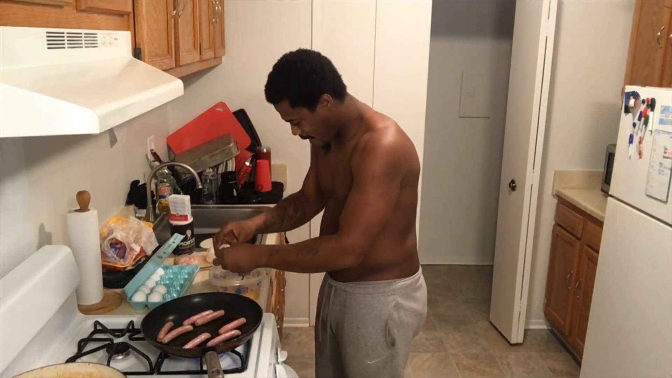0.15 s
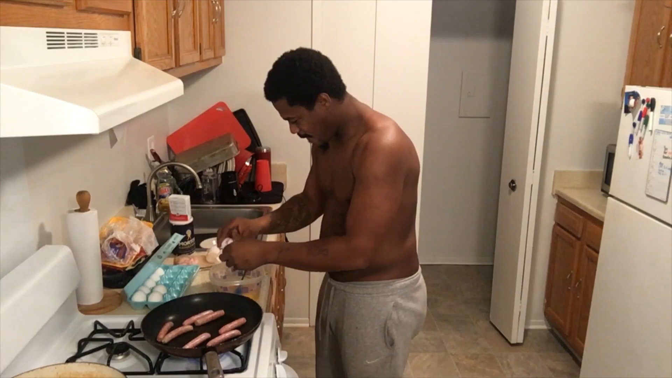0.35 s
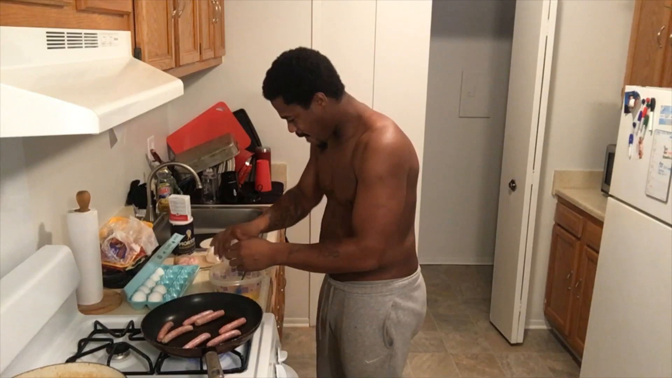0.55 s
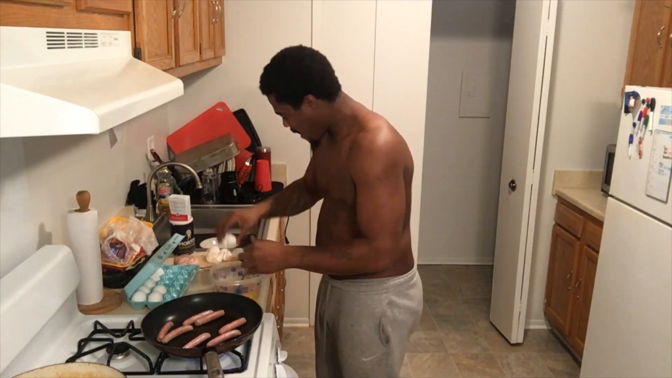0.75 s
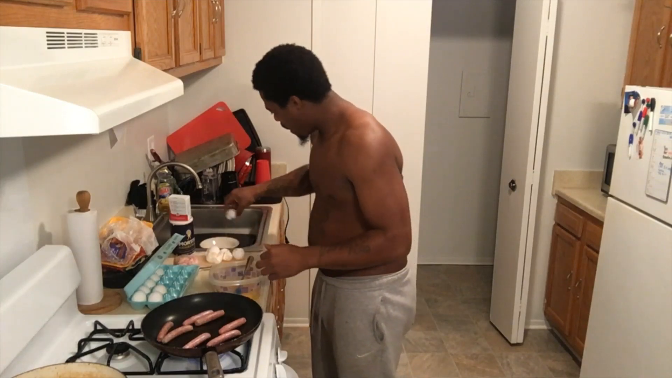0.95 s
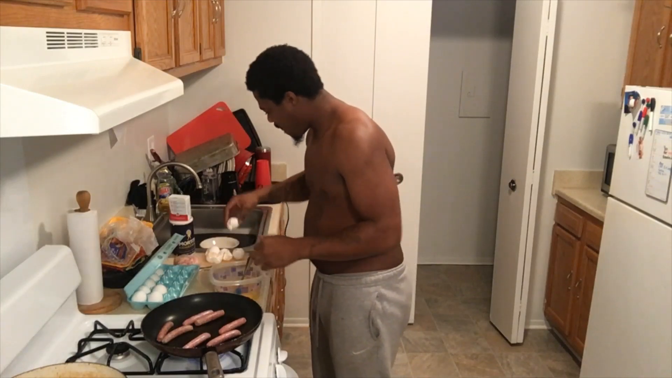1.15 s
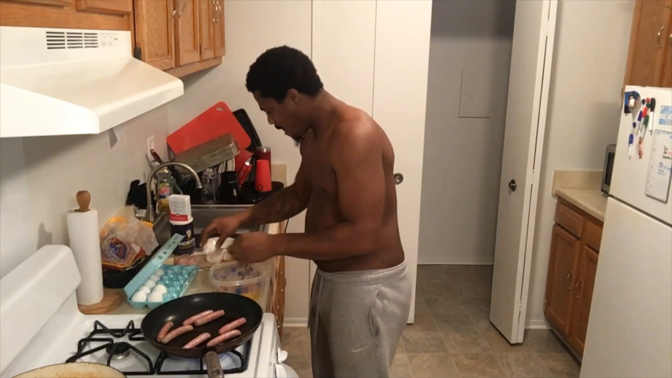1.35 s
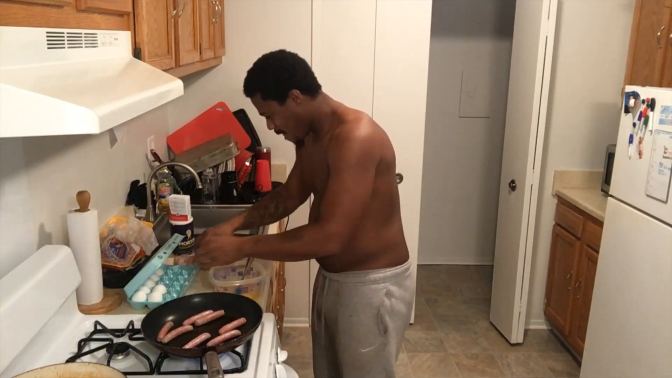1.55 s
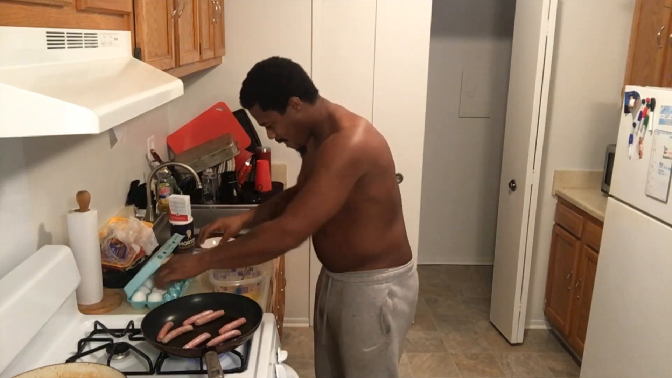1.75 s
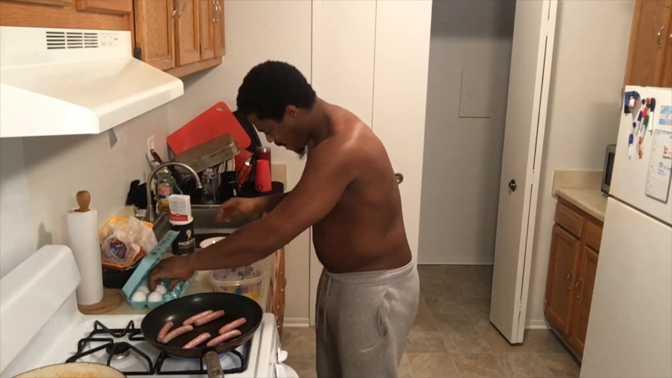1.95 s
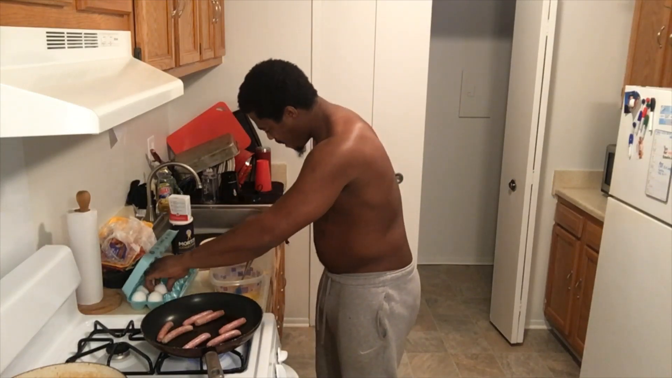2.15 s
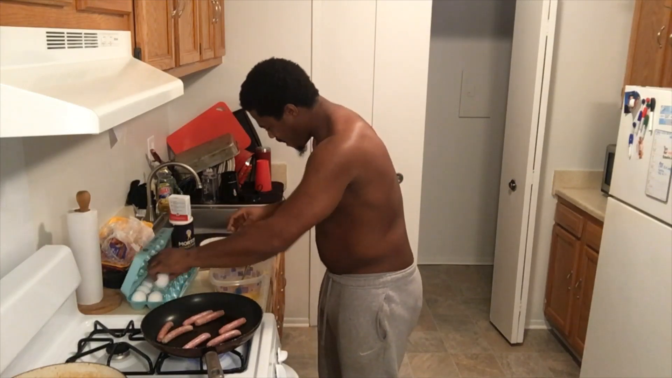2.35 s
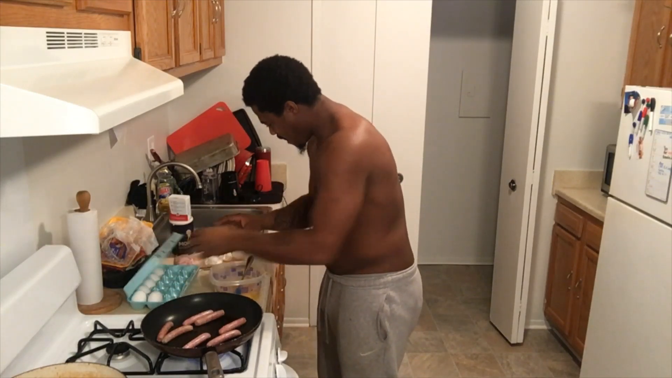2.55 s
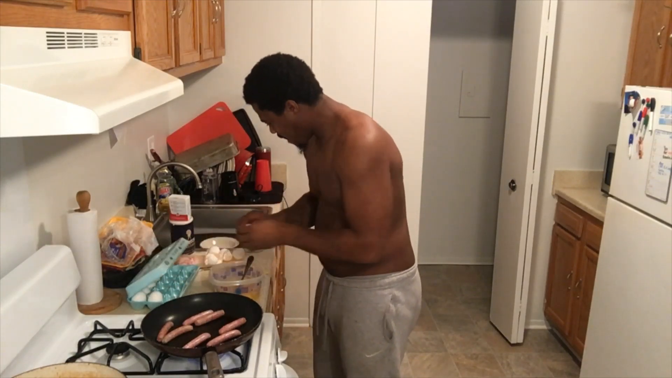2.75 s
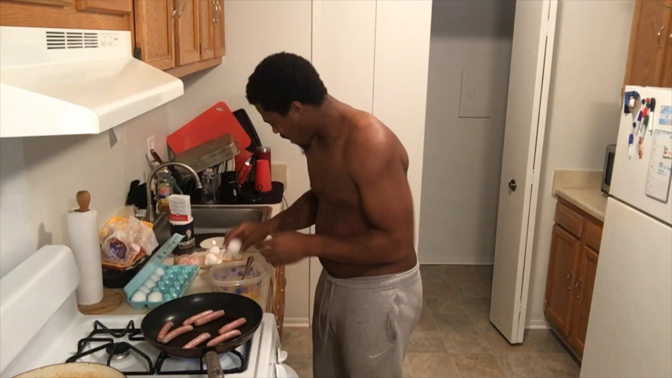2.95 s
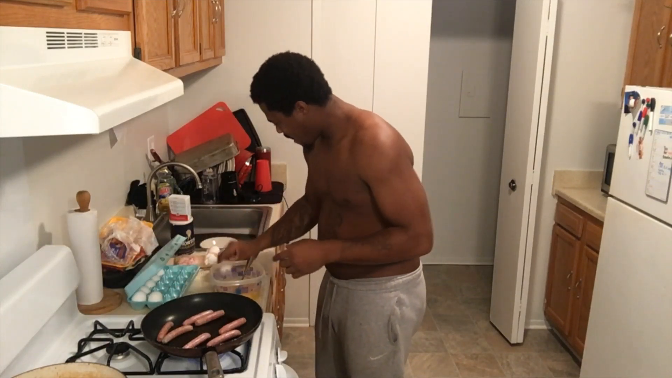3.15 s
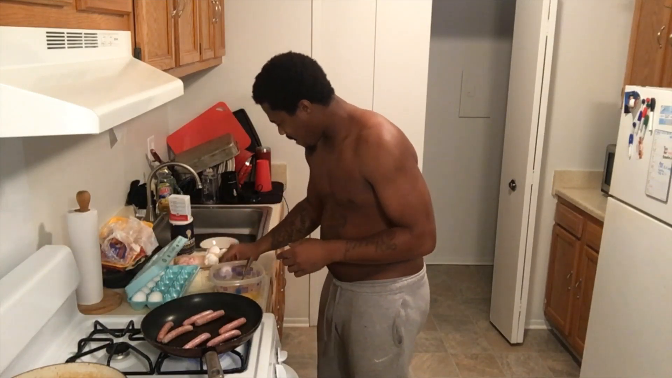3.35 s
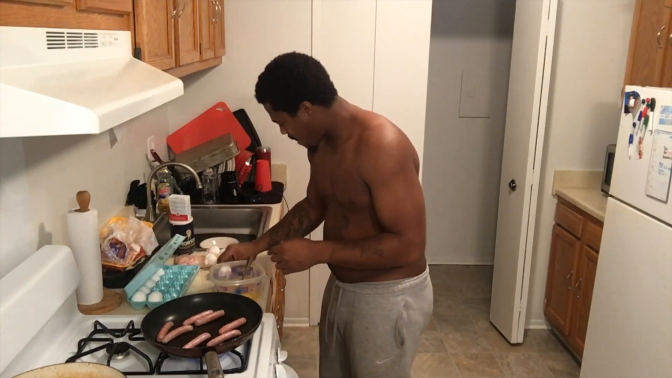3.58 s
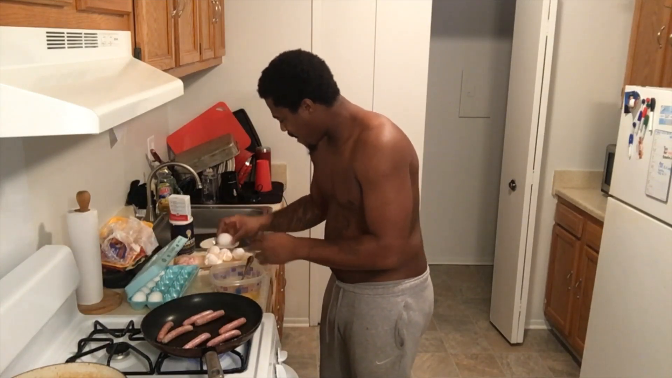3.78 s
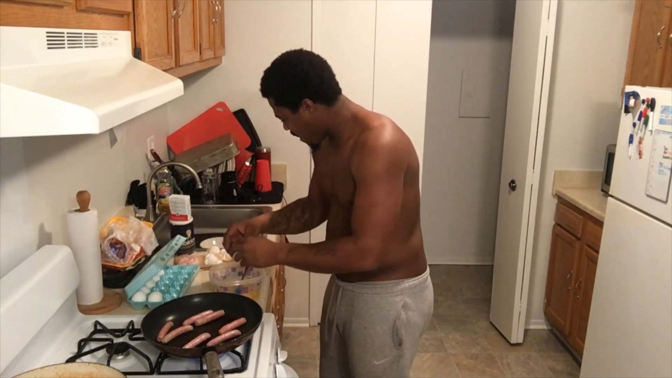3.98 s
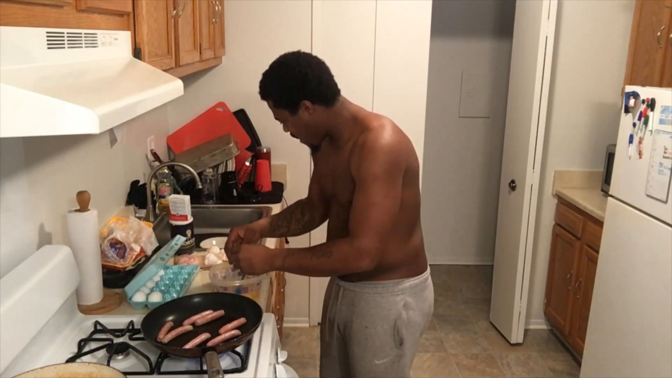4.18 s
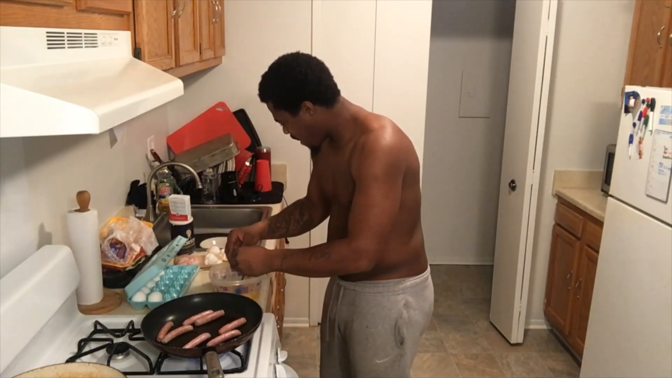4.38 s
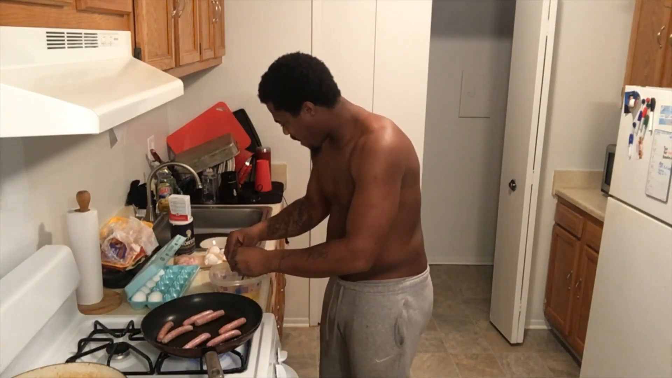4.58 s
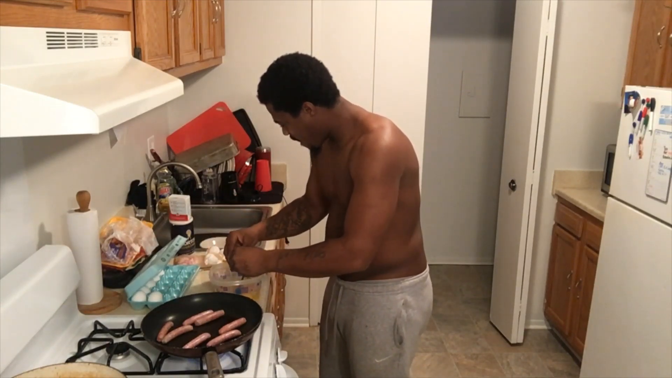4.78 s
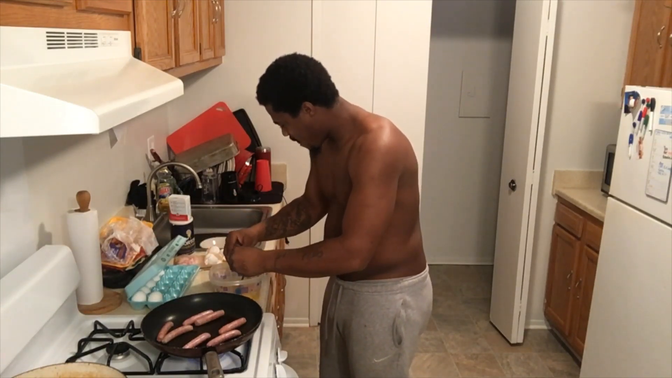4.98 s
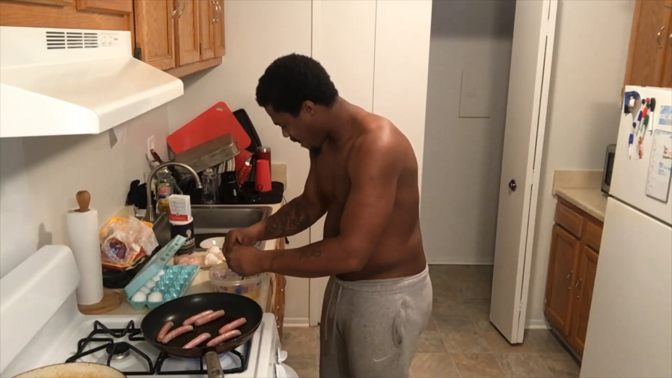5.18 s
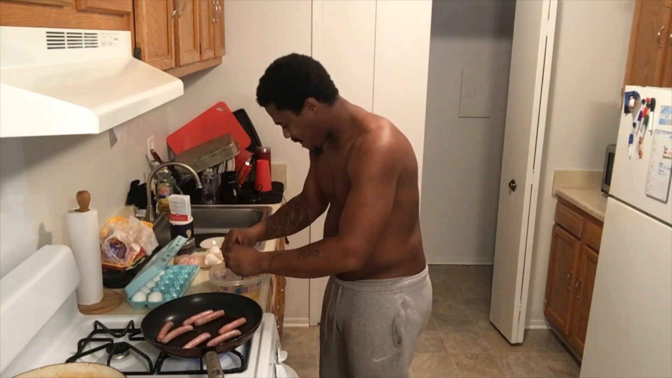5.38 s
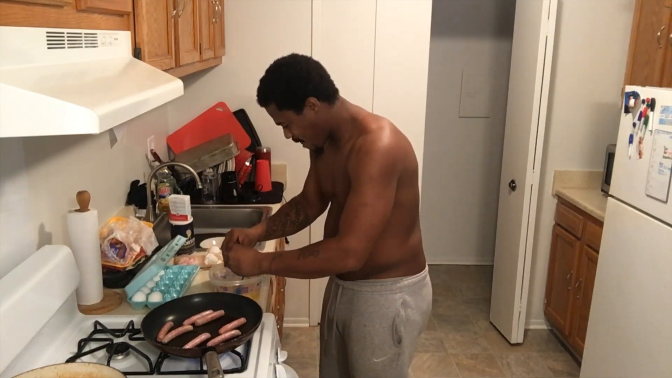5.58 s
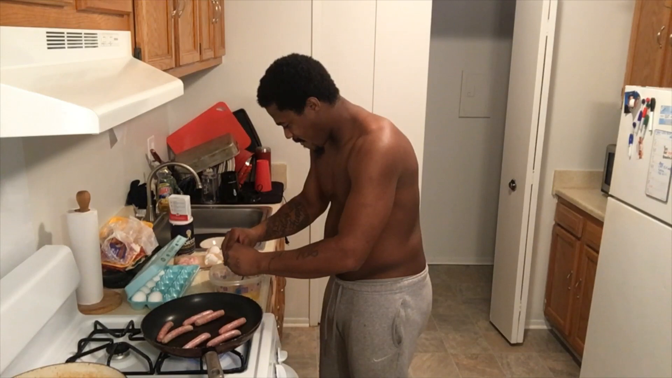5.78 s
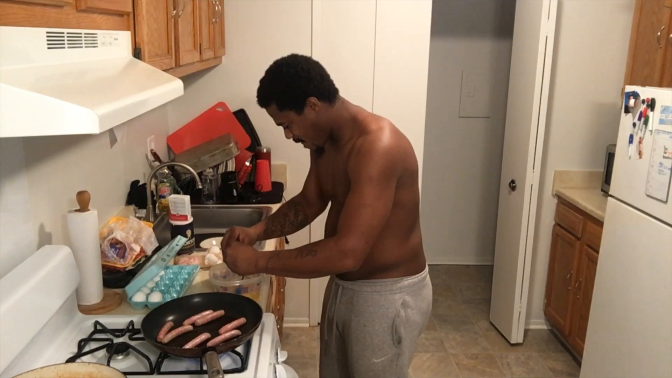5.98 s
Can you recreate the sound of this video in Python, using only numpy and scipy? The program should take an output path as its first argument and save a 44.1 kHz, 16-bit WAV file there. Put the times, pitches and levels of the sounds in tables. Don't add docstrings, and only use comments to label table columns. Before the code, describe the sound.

A small hard-walled kitchen, heard from a few steps away through a thin, midrange-heavy phone microphone. A very faint pan sizzle, appliance hum and low house rumble run throughout. From 0 to 0.5 seconds, thin eggshells knock together in quick, hollow, irregular ticks, clearest around 0.3. Sparse faint clicks follow, then a brighter shell clatter at 1.5. Between about 1.65 and 2.45, fingers rustle and squeak in a foam carton, with soft boxy bumps. After a quiet gap, an egg hits a bowl rim at 3.3, by far the loudest, sharp and ringing; duller raps with counter thuds follow at 3.5 and 3.7, the last crunching. Small splinters snap until 3.9. From 4.3 to 5.8, sparse delicate crackles and slightly wet tears mark the shell being pried open, strongest near 5.0. At 5.9 a shell piece drops with a quick little bounce.

```python
import sys
import numpy as np
from scipy import signal
from scipy.io import wavfile
from scipy.ndimage import uniform_filter1d

SR = 44100
rng = np.random.default_rng(int(sys.argv[2]) if len(sys.argv) > 2 else 0)


def unload_wav(signal):
    wavfile.write(
        sys.argv[1],
        SR,
        np.round(np.clip(np.atleast_2d(signal).T, -1, 1) * 32767).astype(np.int16),
    )


def volts_from_decibels(level):
    exponent = np.asarray(level, float) / 20
    return 10 ** exponent


N = 265923

# start in seconds, peak in dB, shell pitch in Hz, counter thud in dB, crack in dB.
RIM_BLOWS = [
    (3.2867, -13.5, 1100, -21, -1),
    (3.4702, -24.5, 1904, -8.5, 1),
    (3.671, -27, 2982, -9.5, 6),
]
# frequency in Hz, level in dB, decay time t60 in seconds.
BOWL_MODES = [(603.6, -6, .3), (728, -4.5, 0.35), (853, 0, 0.26), (960, 2.5, 0.24), (1077, 5.5, 0.22),
              (1100, 7, .14), (1270, -6, 0.16), (1756, -3, .25), (1855, -0.5, .2), (1940, -8.5, 0.16),
              (2150, -1.5, 0.18), (2330, 2, .12)]
# frequency in Hz, level in dB, decay time t60 in seconds.
COUNTER_MODES = [(45.7, -16.5, .15), (73.2, -11, 0.29), (117.5, -2.5, 0.3), (148.7, -1, 0.2),
                 (212, -3, 0.33), (258, -13.5, 0.16), (354, -18, 0.11), (485, -9, 0.072),
                 (545, -16.5, 0.36)]
BOWL_DB, BOWL_LOSS_DB_PER_CRACK = -12.5, 1.5

# start in seconds, peak in dB, cavity pitch in Hz, crack in dB.
SHELL_KNOCKS = [(0.0096, -52.5, 1940, -17), (0.0392, -48.5, 2000, -4), (0.0963, -46.5, 1310, -17),
                (0.1929, -52, 1240, -14), (0.2762, -36.5, 1267, -3), (0.2904, -36.5, 1500, -8),
                (0.3105, -45, 1870, 0), (0.3228, -36.5, 1340, -3), (0.3372, -40, 1244, -13),
                (0.3618, -42, 1330, -13), (0.412, -47, 1240, -10), (0.4522, -39, 1326, 0),
                (0.4561, -51, 2070, -7), (0.9336, -50, 1420, -13), (1.1262, -44.5, 1384, -16),
                (1.5074, -46.5, 1510, 0), (1.5241, -31, 1330, -2), (1.5328, -33.5, 1510, 2),
                (1.5434, -34, 2180, 1), (1.5744, -45, 2220, -8), (1.6193, -49, 1170, 10)]
# start in seconds, peak in dB, pitch in Hz, crack in dB.
PIECE_DROPS = [
    (5.8884, -29.5, 1900, -3),
    (5.9085, -38, 2500, -8),
    (5.9194, -36, 1900, -6),
    (5.9349, -41, 2000, -9),
]
# start in seconds, peak in dB, pitch in Hz, crack in dB.
SPLINTER_SNAPS = [(0.6393, -42.5, 2770, 0), (1.386, -48.5, 3000, 4), (1.4439, -43, 3060, 4),
                  (2.0777, -45, 2380, 9), (3.05, -51, 2870, 7.5), (3.678, -23.5, 2930, -14),
                  (3.6934, -50, 2880, -14), (3.767, -39, 2400, 5), (3.7878, -39.5, 3150, 3),
                  (3.9188, -37, 2820, 2.5)]
# start in seconds, peak in dB, pitch in Hz, crack in dB.
THUMB_PRISES = [(4.2867, -57, 2820, 4), (4.4876, -36.5, 2790, 2), (4.5087, -51, 2500, 2),
                (4.5756, -42, 3000, 3), (4.6288, -55, 3100, 4), (4.6873, -44, 2750, -9),
                (4.6937, -48, 3080, 1), (4.7776, -54, 2540, 10), (4.806, -57.5, 2620, 11),
                (4.8718, -57, 2680, 0), (4.9946, -44, 3470, -8), (5.0034, -50, 3200, -3),
                (5.0093, -39.5, 2190, 0), (5.017, -31, 2430, 1), (5.026, -53, 2660, -6),
                (5.0834, -51, 2420, 5), (5.3472, -44.5, 2680, -3), (5.691, -48.5, 2620, 0),
                (5.7324, -51.5, 3100, 11), (5.7544, -39, 3120, 5.5), (5.766, -45, 3050, -2),
                (5.8777, -47, 2400, 13)]
# start in seconds, peak in dB, pitch in Hz, crack in dB.
WET_TEARS = [(1.861, -47.5, 525, -16), (2.27, -54, 534, -9), (4.486, -66, 540, -14), (5.014, -42, 680, -8),
             (5.02, -46, 1250, -6), (5.754, -55.5, 786, -14)]

# t60 at 1 kHz in seconds, damping exponent of pitch, bright edge in
# dB, frequency ratio of the second mode, second mode in dB, trim in dB.
SHELL_RINGING = (0.02, 0.47, -19, 1.52, -5, -3.5)
DROP_RINGING = (.02, 0.5, -24, .76, -8, -2)
SNAP_RINGING = (0.0225, 0.56, -8.5, .71, -4.5, -2.5)
PRISE_RINGING = (0.0267, 0.9, -5.5, 0.8, -6, -2.5)
TEAR_RINGING = (0.1, 0.2, -29, 6.5, -20, -10)
EDGE_FOLLOW = 0.49

# time in seconds, rustle level in dB.
HAND_PRESSURE = [(1.64, -71), (1.658, -59), (1.69, -70), (1.77, -71), (1.85, -58.5), (2.2, -55.5),
                 (2.268, -52.5), (2.39, -57.5), (2.44, -68)]
# time in seconds, box boom in dB, boom pitch in Hz, scrape in dB.
CARTON_GRIPS = [(1.725, -56, 210, -78), (1.876, -54, 181, -49.5), (1.962, -56.5, 515, -50.5),
                (2.268, -52.5, 473, -55.5), (2.328, -53.5, 477, -61), (2.424, -70, 330, -49.5)]
# start in seconds, peak in dB, pitch in Hz, length in seconds.
FOAM_SQUEAKS = [(1.8593, -40, 2760, 0.016), (1.88, -42, 2740, 0.014), (1.9044, -55, 2350, 0.023),
                (2.2236, -40, 2780, 0.015), (2.262, -47, 2530, 0.066), (2.283, -45, 2860, 0.018),
                (2.352, -38.5, 3030, 0.02), (2.368, -49, 2760, 0.024), (2.3989, -41, 2960, 0.026),
                (2.4144, -67, 2690, 0.03)]
GRIP_RISE_DB_PER_S, GRIP_FALL_DB_PER_S, LET_GO_S = 600, 230, 0.046

# start in seconds, peak in dB, pitch in Hz, t60 in seconds.
CABINET_THUMPS = [(1.461, -49, 49.4, 0.15), (1.71, -46.5, 190, 0.17), (1.74, -43.5, 75, 0.15),
                  (1.791, -52, 61.9, 0.24), (1.869, -48, 115, 0.15), (2.369, -56, 45.8, 0.15),
                  (3.662, -37, 109, 0.13), (3.818, -45, 73, 0.19), (5.949, -70, 72.7, 0.13)]

# frequency in Hz, level in dB.
SIZZLE_SPECTRUM = [(800, -33.5), (1600, -12.5), (2800, 3), (4000, -11), (5200, -2), (8000, -1.5),
                   (11000, -5.5), (15000, -0.5)]
# frequency in Hz, level in dB.
RUMBLE_SPECTRUM = [(20, -17.5), (50, 1.5), (120, -14.5), (180, -16), (250, -8.5), (500, -15.5), (1000, -22),
                   (1600, -18.5), (3000, -17)]
# frequency in Hz, rms level in dB.
MOTOR_LINES = [(80.7, -86.5), (118.4, -73.5), (242.2, -71.5), (419.9, -79.5)]
SIZZLE_DB, RUMBLE_DB = -62, -60

# frequency in Hz, t60 in seconds.
KITCHEN_T60 = [(100, 0.6), (700, 0.5), (1840, 0.56), (4000, 0.44), (6000, 0.34), (12000, 0.14)]
# delay in seconds, level in dB.
NEAR_ECHOES = [(.0031, 1), (.0043, 3), (.0068, -8), (.0102, -1.5), (.0160, -14.5), (.0230, -2.5),
               (.0320, -9.5), (.0450, -14)]

# frequency in Hz, gain in dB.
MIC_RESPONSE = [(18, -10), (45, -2), (1500, -1), (2800, 5.5), (3300, 1.5), (4000, -10), (5100, -20),
                (5450, -24), (7800, -16), (9500, -21), (10500, -28.5), (14800, -35.5), (15600, -62.5),
                (22000, -57.5)]
# centre in seconds, length in seconds.
DROPOUTS = [(.234, .005), (.663, .004), (.789, .007), (.853, .007), (.918, .005), (1.042, .020),
            (1.559, .005), (1.685, .006), (1.794, .012), (1.898, .007), (2.755, .008), (3.776, .007),
            (4.223, .010), (4.532, .019), (4.716, .005), (5.355, .006)]
# frequency in Hz, share dropped from 0 to 1.
WEAK_BANDS = [(500, 0), (800, .6), (1600, 0), (2200, 0), (3600, 0), (4200, 0.8), (16000, 0.84)]
DROPOUT_DB, DROPOUT_DB_PER_S = -15, -600


def evened(x):
    return x / np.sqrt(np.mean(x ** 2) + 1e-20)


def read(points, hz):
    f, value = np.transpose(points)
    return np.interp(np.log(hz + 1), np.log(f + 1), value)


def add(mix, s, sound):
    part = mix[round(s * SR):][:len(sound)]
    part += sound[:len(part)]


def coloured(x, spectrum):
    hz = abs(np.fft.fftfreq(8192, 1 / SR))
    log_gain = np.log(volts_from_decibels(read(spectrum, hz)))
    phase = signal.hilbert(log_gain).imag
    taps = np.fft.ifft(np.exp(log_gain - 1j * phase)).real
    if abs(taps[:4096]).sum() < abs(taps[4096:]).sum():
        taps = np.roll(taps[::-1], 1)
    return signal.oaconvolve(x, taps[:4096])[:len(x)]


def resonate(x, hz, width):
    turn = np.exp(2j * np.pi * np.cumsum(hz * np.ones(len(x))) / SR)
    r = np.exp(-np.pi * width / SR)
    return 2 * (turn * signal.lfilter([1 - r], [1, -r], x / turn)).real


def drift(rate_hz):
    knots = rng.standard_normal(400)
    return np.interp(np.arange(N) / SR * rate_hz, np.arange(len(knots)), knots)


def ring(hz, t60, rise=0.00052):
    t = np.arange(SR // 2) / SR
    return np.sin(2 * np.pi * hz * t) * volts_from_decibels(-60 * t / t60) * (1 - np.exp(-t / rise))


def crack(t60, hz, width, edge_db):
    fade = volts_from_decibels(-60 * np.arange(SR // 2) / SR / t60)
    jag = rng.choice([-1., 1.], len(fade)) * fade
    body = resonate(resonate(jag, hz, width), hz, 1.62 * width)
    body = body * np.linalg.norm(fade) / np.linalg.norm(body) * 0.5
    edge = resonate(resonate(jag, 3900, 3200), 6400, 6000)
    return body, volts_from_decibels(edge_db + 7) * edge


def blows():
    air, solid = np.zeros((2, N))
    bowl = sum(volts_from_decibels(db) * ring(hz, t60) for hz, db, t60 in BOWL_MODES)
    thud = sum(volts_from_decibels(db) * ring(hz, t60, rise=0.0078) for hz, db, t60 in COUNTER_MODES)
    for s, db, hz, thud_db, crack_db in RIM_BLOWS:
        bowl_db = BOWL_DB - BOWL_LOSS_DB_PER_CRACK * crack_db
        knock = volts_from_decibels(bowl_db + 10) * crack(0.023, 1070, 1100, -40)[0]
        shell = ring(hz, 0.0081) + volts_from_decibels(crack_db) * sum(crack(0.0051, 1950, 1970, -11))
        add(air, s, volts_from_decibels(db - 5.5) * (shell + knock))
        hollow = volts_from_decibels(-19) * ring(hz, 0.17, rise=0.004)
        hollow += volts_from_decibels(-16.5) * ring(hz * 0.972, 0.22, rise=0.004)
        rattle = volts_from_decibels(thud_db - 4) * crack(0.46, 356, 420, -60)[0]
        add(solid, s, volts_from_decibels(db) * (volts_from_decibels(bowl_db - 8) * bowl + hollow + rattle))
        add(solid, s, volts_from_decibels(db + thud_db + 1.5) * thud)
    return air, solid


def knocks(table, ringing):
    t60_1k, damping, edge_db, second_ratio, second_db, trim_db = ringing
    out = np.zeros(N)
    for s, db, hz, crack_db in table:
        t60 = t60_1k * (1000 / hz) ** damping
        body = ring(hz, t60) + volts_from_decibels(second_db) * ring(hz * second_ratio, 0.8 * t60)
        split, edge = crack(0.0063, 2860, 2000, edge_db + EDGE_FOLLOW * crack_db)
        add(out, s, volts_from_decibels(db + trim_db) * (body + volts_from_decibels(crack_db) * split + edge))
    return out


def carton():
    t = np.arange(N) / SR
    s, pressure_db = np.transpose(HAND_PRESSURE)
    touch = np.interp(t, [s[0], s[0] + 0.016, s[-1], s[-1] + LET_GO_S], [0, 1, 1, 0])
    at, boom_db, boom_hz, scrape_db = np.transpose(CARTON_GRIPS)[:, :, None]
    shape_db = np.minimum(GRIP_RISE_DB_PER_S * (t - at), GRIP_FALL_DB_PER_S * (at - t))
    strongest = np.argmax(boom_db + shape_db, axis=0)
    hz = uniform_filter1d(boom_hz[strongest, 0], size=600)

    slip_db = 3 * np.minimum(rng.exponential(1, N), 3)
    slips = rng.standard_normal(N) * volts_from_decibels(slip_db) * (rng.random(N) < 1500 / SR)
    rustle = resonate(slips, 2900, 600) + volts_from_decibels(8) * resonate(slips, 1980, 690)
    scrape = resonate(resonate(slips, 890, 900), 1200, 1600)
    boom = resonate(resonate(rng.standard_normal(N), hz, 390), hz, 450)

    out = volts_from_decibels(np.interp(t, s, pressure_db) - 11.5) * evened(rustle)
    out += volts_from_decibels((scrape_db + shape_db).max(0) - 15.5) * evened(scrape)
    out += volts_from_decibels((boom_db + shape_db).max(0) - 9) * evened(boom)
    out *= touch
    for start, db, squeak_hz, length in FOAM_SQUEAKS:
        rub = rng.standard_normal(4000)[:round(length * SR)]
        squeak = evened(resonate(rub, squeak_hz, 550)) * np.hanning(len(rub))
        add(out, start - 0.004, volts_from_decibels(db - 18) * squeak)
    return out


def thumps():
    out = np.zeros(N)
    for s, db, hz, t60 in CABINET_THUMPS:
        add(out, s, volts_from_decibels(db) * ring(hz, t60, rise=0.014))
    return out


def pan():
    burst_db = 2.3 * np.minimum(rng.exponential(1, N), 5)
    bursts = rng.standard_normal(N) * volts_from_decibels(burst_db) * (rng.random(N) < 2500 / SR)
    tail = rng.standard_normal(2000) * volts_from_decibels(-60 * np.arange(2000) / SR / 0.033)
    smeared = signal.oaconvolve(bursts, tail)[:N]
    fizz = 0.5 * evened(smeared) + 1.96 * rng.standard_normal(N)
    return volts_from_decibels(SIZZLE_DB + 0.56 * drift(5)) * coloured(fizz, SIZZLE_SPECTRUM)


def appliances():
    rumble = evened(coloured(rng.standard_normal(N), RUMBLE_SPECTRUM))
    rumble = volts_from_decibels(RUMBLE_DB + 2.5 + drift(13)) * rumble
    lines = sum(volts_from_decibels(db) * evened(resonate(rng.standard_normal(N), hz, 7)) for hz, db in MOTOR_LINES)
    return rumble + lines


def kitchen(x):
    taps = np.zeros(SR)
    at = np.arange(200, SR - 20, 20)
    taps[at + rng.integers(0, 20, len(at))] = rng.choice([-1., 1.], len(at))
    hz, t, z = signal.stft(taps, SR, nperseg=256)
    decay = volts_from_decibels(-60 * t / read(KITCHEN_T60, hz)[:, None])
    tail = signal.istft(z * decay, SR, nperseg=256)[1]
    tail = volts_from_decibels(5) * tail / np.linalg.norm(tail)
    for k, (s, db) in enumerate(NEAR_ECHOES):
        tail[round(s * SR)] += (-1) ** k * volts_from_decibels(db)
    return signal.fftconvolve(x, tail)[:N]


def scene():
    rim, counter = blows()
    pile = knocks(SHELL_KNOCKS, SHELL_RINGING) + carton()
    fingers = knocks(PIECE_DROPS, DROP_RINGING) + knocks(SPLINTER_SNAPS, SNAP_RINGING)
    fingers += knocks(THUMB_PRISES, PRISE_RINGING) + knocks(WET_TEARS, TEAR_RINGING)
    room = kitchen(rim) + volts_from_decibels(-3.5) * kitchen(pile) + volts_from_decibels(-8) * kitchen(fingers)
    direct = rim + counter + pile + fingers
    return (direct + room + thumps() + pan() + appliances())[None]


def drop_weak_bands(x):
    hz, t, z = signal.stft(x, SR, nperseg=256, noverlap=192)
    drop_db = np.zeros(len(t))
    for s, length in DROPOUTS:
        depth_db = DROPOUT_DB + DROPOUT_DB_PER_S * length
        drop_db += depth_db * np.clip(1 - (abs(t - s) - length / 2) / 0.004, 0, 1)
    mottle_db = 2.16 * evened(uniform_filter1d(rng.standard_normal(z.shape), size=14))
    share = np.clip(read(WEAK_BANDS, hz), 0, 1)[:, None]
    z = z * volts_from_decibels(share * (drop_db + mottle_db))
    return signal.istft(z, SR, nperseg=256, noverlap=192)[1][None, :N]


def top_cut(x):
    return signal.sosfilt(signal.butter(12, 15330, fs=SR, output="sos"), x)


def record(dry):
    heard = coloured(dry[0], MIC_RESPONSE)
    finished = drop_weak_bands(heard)
    return top_cut(finished)


dry = scene()
out = record(dry)
unload_wav(out)
```